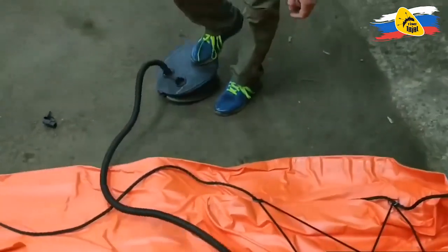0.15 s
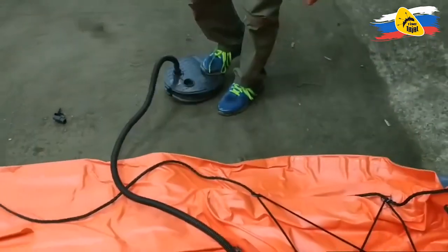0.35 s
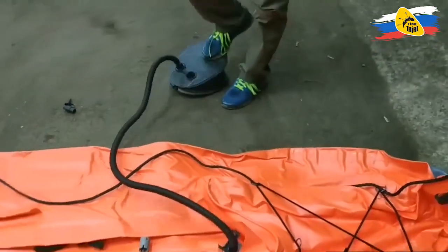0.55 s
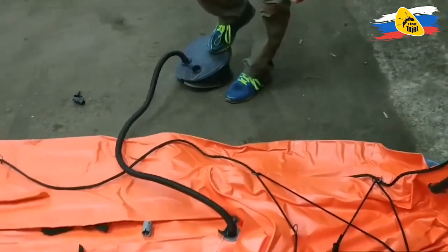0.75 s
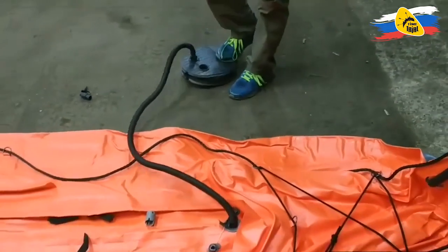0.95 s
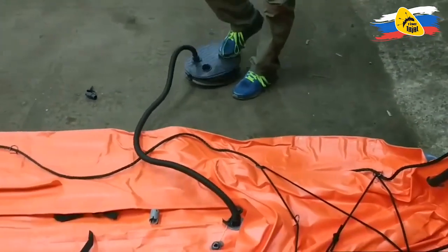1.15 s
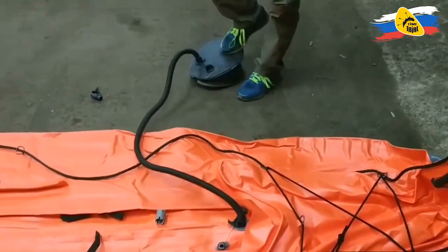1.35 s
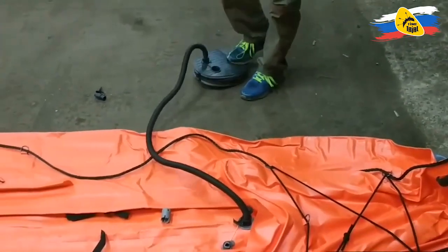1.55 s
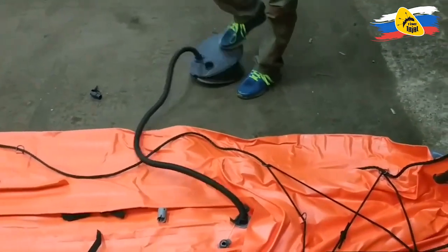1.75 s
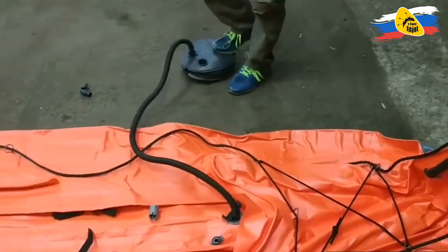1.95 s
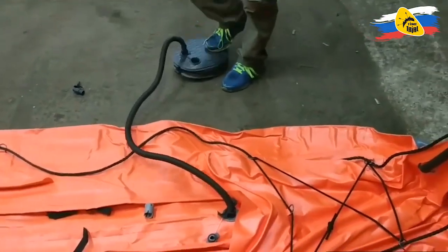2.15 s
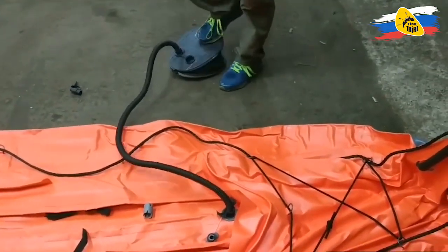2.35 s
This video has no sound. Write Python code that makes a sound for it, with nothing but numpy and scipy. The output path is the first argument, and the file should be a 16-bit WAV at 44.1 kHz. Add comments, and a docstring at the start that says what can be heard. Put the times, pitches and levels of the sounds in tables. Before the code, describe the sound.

A foot pump inflates a boat in four hissing strokes with a thin whistle.

```python
"""A foot bellows pumps up an inflatable boat in a large, hard-floored hall: four strokes.
First the plastic pump ticks and its folds thump and crumple under the foot. Air hisses through
the hose, and the valve whistles on the hose's resonances (the pitches it rings at by itself).
Then, while the whistle lingers in the hall, the bellows spring open and suck in air, crumpling
and thumping again. Three more strokes follow, with a higher, louder whistle."""
import sys
import numpy as np
from scipy import signal
from scipy.fft import rfft, irfft
from scipy.io import wavfile

SR = 44100
rng = np.random.default_rng(int(sys.argv[2]) if len(sys.argv) > 2 else 0)


def output_pcm(signal):
    """Save a mono or channel-first signal as 16-bit PCM at the path in sys.argv[1].

    Samples are clipped to [-1, 1] before scaling.
    """
    pcm = np.clip(np.atleast_2d(signal).T, -1, 1) * 32767
    wavfile.write(sys.argv[1], SR, np.round(pcm).astype(np.int16))


N = 110250


def valve_jet(t, hose_hz, hose_db):
    """How hard the jet drives each hose resonance at times t: most of all near its own pitch."""
    # one table per whistle: (time [s], level [dB], pitch [Hz], spread [Hz])
    whistles = [
        [(.3, -33, 2200, 58), (.33, -26.5, 2290, 90), (.39, -24.5, 2510, 190), (.425, -29, 2930, 250),
         (.46, -20.5, 3110, 258), (.495, -16.5, 3070, 116), (.53, -18.5, 3200, 130), (.55, -42, 3280, 250)],
        [(.565, -32, 2210, 37.7), (.582, -26, 2324, 40)],
        [(1., -33, 3850, 500), (1.04, -16.5, 3770, 450), (1.09, -9, 3645, 100), (1.13, -15, 3740, 198),
         (1.19, -14.5, 3670, 101), (1.23, -20, 3730, 257)],
        [(1.57, -28, 3400, 230), (1.6, -14.5, 3740, 240), (1.63, -10, 3700, 92), (1.655, -11.5, 3730, 26),
         (1.685, -9, 3668, 23), (1.735, -21, 3635, 23), (1.78, -32, 3700, 40), (1.82, -13.5, 3740, 20),
         (1.87, -23.5, 3630, 21)],
        [(1.75, -27, 2470, 40), (1.79, -31.5, 2400, 40)],
        [(2.09, -27, 3730, 694), (2.125, -14, 3800, 700), (2.16, -12.5, 3750, 415), (2.2, -16, 3680, 334),
         (2.26, -17, 3550, 335), (2.3, -13.5, 3500, 110), (2.325, -35, 3700, 200), (2.36, -16.5, 3900, 110)],
    ]
    reach_hz, steepness, edge_s = 484, 1.24, 0.0039
    drive = np.zeros((len(hose_hz), len(t)))
    for rows in whistles:
        times, *columns = np.transpose(rows)
        db, pitch, spread = (np.interp(t, times, c) for c in columns)
        away = hose_hz[:, None] - pitch
        share = amp(hose_db)[:, None] / (1 + (away / spread) ** 2) ** steepness
        share *= np.exp(-(away / reach_hz) ** 4)  # far-off resonances stay silent
        fade = np.exp(-abs(t - np.clip(t, times[0], times[-1])) / edge_s)
        drive += share / np.linalg.norm(share, axis=0) * amp(db) * fade
    return drive


def whistle():
    """The valve jet makes the hose ring; each tone lingers in the hall, with a faint octave on top."""
    # resonances of the hose: (pitch [Hz], level [dB])
    resonances = [(2229, 2), (2335, -2), (2430, 0), (2556, 3), (2989, -1), (3094, 1), (3216, -7),
                  (3340, -3), (3455, 3), (3580, -3), (3688, 2), (3792, -1), (3912, -5), (4030, 2)]
    linger_s, left_lag_s = 1.17, 0.000095
    beat_depth, beat_share, dip_s = .4, .00423, 1.787
    hose_hz, hose_db = np.transpose(resonances)
    t, now = np.arange(0, N / SR, 1 / 1000), np.arange(N) / SR
    drive = valve_jet(t, hose_hz, hose_db)
    kept = decay(t[1], linger_s) ** 2  # share of energy left after each step
    linger = np.sqrt(signal.lfilter([1 - kept], [1, -kept], drive ** 2))
    direct = echo = 0
    for hz, driven, lingering in zip(hose_hz, drive, linger):
        tone = np.exp(2j * np.pi * (hz * now + rng.random()))
        rough = (hose_hz[-1] / hz) ** 2.9  # low resonances are less steady
        stereo = np.exp(-2j * np.pi * hz * left_lag_s * np.array([[1], [0]]))
        flutter = 0.087 * wander(rate_hz=7) + 0.29 * wander(rate_hz=48.5)
        direct += np.interp(now, t, driven) * tone * unit(stereo + rough * flutter)
        # the lingering tone drifts and pulses
        drift = 0.47 * wander(rate_hz=14.3 * rough)
        beat = 1 - beat_depth * np.exp(2j * np.pi * beat_share * hz * (now - dip_s))
        echo += np.interp(now, t, lingering) * tone * unit(1j * stereo * beat + drift)
    swing = np.interp(now, t, np.linalg.norm(drive, axis=0)) + 1e-6
    direct *= (.5 + .5 * abs(direct / swing) ** 2) ** -.3  # the jet limits its own swing
    echo_gain, side_gains = amp(-1.5), amp([[-0.5], [-2.1]])
    doubled = (direct ** 2 + echo_gain * echo ** 2).real  # squaring doubles the pitch
    octave = amp(-33) * unit(band(doubled, hz=7600, width_hz=1400))
    return np.sqrt(2) * side_gains * (direct + echo_gain * echo).real + hall(octave, wet_db=-11)


def push_air():
    """Each push forces air out: it hisses at the valve and rushes through the hose."""
    # pushes of the foot: (start [s], rise [s], hold [s], level [dB])
    pushes = [(.19, 0.19, 0.16, 3.5), (.905, 0.12, 0.16, 4.5), (1.47, 0.099, 0.18, 3.5),
              (1.97, 0.12, 0.14, 2.35)]
    # hiss at the valve: (frequency [Hz], level [dB])
    hiss = [(3000, -69), (4500, -12), (5000, -1.5), (6600, 1.5), (7500, 9), (8700, 2), (9700, 6.5),
            (11900, 1.5), (14500, 5.5), (16200, -4.5)]
    # rush in the hose: (frequency [Hz], level [dB])
    rush = [(200, -13), (500, 1), (900, 0.5), (1500, -1), (2400, 3.5), (3200, 0.5), (4400, -5), (6000, -80)]
    hose_echo_s = .0087
    jet = amp(-28) * patchy(noise(hiss)) + amp(-36.5) * noise(rush)
    jet += .15 * np.roll(jet, round(hose_echo_s * SR), 1)
    return jet * swells(pushes)


def refill_air():
    """The bellows spring open and suck in air: a low draught and a fainter hiss."""
    # openings of the bellows: (start [s], rise [s], hold [s], level [dB])
    refills = [(.6, 0.037, 0.23, -3), (1.26, 0.043, 0.083, 1), (1.79, 0.056, 0.046, 2),
               (2.3, 0.041, 0.058, 1)]
    # draught into the bellows: (frequency [Hz], level [dB])
    draught = [(120, -39), (250, 0), (600, -0.5), (1000, -2.5), (1500, -7.5), (2500, -11.5), (5000, -16),
               (15000, -20)]
    # hiss at the inlet: (frequency [Hz], level [dB])
    hiss = [(1200, -12), (2500, 10), (5000, -3), (7000, 3.5), (11000, -3), (15000, -24)]
    return (amp(-37.5) * noise(draught) + amp(-42.5) * patchy(noise(hiss))) * swells(refills)


def patchy(x):
    """Makes a hiss louder and softer in random patches of time and frequency."""
    depth_db, patch_hz, patch_s = 5, 400, 0.069
    hz, t, spectra = signal.stft(x, SR, nperseg=1024)
    field = np.fft.fft2(rng.standard_normal(spectra.shape[1:]))
    field *= np.exp(-(np.fft.fftfreq(len(hz), hz[1])[:, None] * patch_hz) ** 2)
    field *= np.exp(-(np.fft.fftfreq(len(t), t[1]) * patch_s) ** 2)
    patches = amp(depth_db * unit(np.fft.ifft2(field).real))
    return unit(signal.istft(spectra * patches, SR, nperseg=1024)[1][:, :N])


def fold_thumps():
    """Big folds snap over with a slap and make the bellows ring briefly."""
    # folds snapping: (time [s], level [dB], pitch [Hz], slap compared with ring [dB])
    snaps = [(0.146, -7, 229, -20), (.255, -16.5, 250, -36), (.314, -25, 322, 0.5), (.691, -12, 275, -9),
             (.765, -17, 306, -5.5), (0.778, -13.5, 261, -39), (0.871, -16, 266, -48),
             (.916, -15.5, 295, -12), (.977, -22, 411, 0.5), (1.401, -8.5, 289, -10.5),
             (1.483, -36.5, 303, 14.5), (1.528, -18, 324, -5), (1.851, -15, 271, -4.5),
             (1.906, -14, 287, -10.5), (1.991, -9.5, 286, -35), (2.028, -18.5, 260, -3),
             (2.346, -16.5, 270, -12), (2.393, -14.5, 298, -22)]
    # tones of the bellows: (pitch [ratio], level [dB], fade time [s])
    tones = [(1, -4, 0.11), (0.91, -27, 0.25)]
    # slap of a fold: (frequency [Hz], level [dB])
    slap_colour = [(30, -19), (110, -16), (220, 1.5), (450, 1), (750, -1.5), (1200, -15), (2500, -16),
                   (8000, -45)]
    out, t = np.zeros((2, N)), np.arange(SR // 5) / SR
    rise_s = 0.0041
    for start, db, hz, slap_db in snaps:
        ring = sum(amp(tone_db) * decay(t, fade_s) * np.sin(2 * np.pi * hz * ratio * t)
                   for ratio, tone_db, fade_s in tones)
        slap = amp(slap_db) * noise(slap_colour, len(t)) * decay(t, fade_s=0.11)
        add(out, start, amp(db) * np.minimum(t / rise_s, 1) * (ring + slap))
    return out


def crumple():
    """Small creases click at random as the bellows open and are trodden down."""
    # spells of crumpling: (start [s], rise [s], hold [s], level [dB])
    spells = [(.17, 0.056, 0.23, -1), (.6, 0.08, 0.33, 0), (1.24, 0.11, 0.15, -2), (1.8, 0.12, 0.15, 3.5),
              (2.3, 0.065, 0.31, -1)]
    # sound of a crease: (frequency [Hz], level [dB])
    crease_colour = [(100, -58), (135, -10), (180, -1), (255, 2.5), (330, 1.5), (420, 0), (520, -8.5),
                     (700, -6.5), (1100, -14), (2500, -23.5), (9000, -85)]
    creases_per_s, spread_db = 240, 2
    hits = rng.random(N) < creases_per_s / SR
    sizes = amp(spread_db * np.minimum(rng.exponential(1, N), 3))
    creases = hits * sizes * rng.choice([-1, 1], (2, N))
    return amp(-34) * colour(creases, crease_colour) * swells(spells)


def plastic_ticks():
    """The pump's plastic ticks and scuffs in short bursts of noise."""
    # ticks and scuffs: (time [s], level [dB], centre [Hz], width [Hz], fade time [s])
    ticks = [(.008, -24, 1440, 2140, 0.062), (0.1455, -24, 1770, 1500, 0.063),
             (0.153, -29.5, 7700, 12100, 0.083), (0.2235, -21, 1480, 1070, 0.038),
             (.315, -25.5, 805, 517, 0.13), (0.6563, -14, 4170, 9600, 0.014),
             (0.909, -25, 1130, 434, 0.047), (0.956, -23.5, 1230, 2200, 0.039),
             (1.074, -23.5, 784, 395, 0.12)]
    out, t = np.zeros((2, N)), np.arange(SR // 5) / SR
    for start, db, hz, width_hz, fade_s in ticks:
        burst = unit(band(rng.standard_normal((2, len(t))), hz, width_hz))
        add(out, start, amp(db) * burst * decay(t, fade_s))
    return out


def hall(x, wet_db):
    """Adds the hall's blur of echoes at level wet_db; each frequency dies at its own speed."""
    # how long the hall rings: (frequency [Hz], fade time [s])
    fades = [(100, 0.11), (300, 0.53), (1000, 1), (3500, 0.72), (8000, 0.39), (16000, 0.38)]
    echoes = rng.standard_normal((2, SR)) * (np.arange(SR) > SR // 150)
    hz, t, spectra = signal.stft(echoes, SR, nperseg=256)
    tail = signal.istft(spectra * decay(t, read(fades, hz)[:, None]), SR, nperseg=256)[1]
    return x + amp(wet_db) * signal.fftconvolve(x, tail / np.linalg.norm(tail[0]), axes=1)[:, :N]


def background():
    """The quiet of the hall: a soft, steady, low noise."""
    # room noise: (frequency [Hz], level [dB])
    room_colour = [(25, 18.5), (70, 6), (120, -6.5), (260, 16.5), (500, 0.5), (1200, 1), (3000, -13),
                   (16000, -19)]
    return amp(-38) * noise(room_colour)


def swells(strokes):
    """Loudness curve: each stroke swells quickly, sags a little while held, and lets go."""
    from_db, sag_db_per_s, release_db_per_s = -29.5, -19.5, -200
    t, total = np.arange(N) / SR, 0
    for start, rise, hold, db in strokes:
        onset = from_db * np.maximum(1 - (t - start) / rise, 0) ** 2
        sag = sag_db_per_s * np.clip(t - start - rise, 0, hold)
        release = release_db_per_s * np.maximum(t - start - rise - hold, 0)
        total += amp(db + onset + sag + release)
    return unit(total)


def colour(x, spectrum):
    """Sets the bass and treble of two unrelated signals and blends them into left and right."""
    # how alike the sides are: (frequency [Hz], likeness [-1 to 1])
    likeness = [(60, -0.15), (200, 1), (380, 0.85), (700, 0.94), (1300, 0.13), (2400, 0.57), (4400, 0.57),
                (8000, -0.38), (15000, 0.026)]
    # which side is louder: (frequency [Hz], left minus right [dB])
    balance = [(60, -0.5), (280, -1.5), (650, 0), (1400, 2.5), (3000, 3), (7500, -1), (14000, 1.5)]
    hz = np.fft.rfftfreq(x.shape[1], 1 / SR)
    left, other = rfft(x)
    alike = np.clip(read(likeness, hz), -1, 1)
    right = alike * left + np.sqrt(1 - alike ** 2) * other
    gain = amp(read(spectrum, hz) + np.outer([.5, -.5], read(balance, hz)))
    return unit(irfft(np.array([left, right]) * gain, x.shape[1]))


def noise(spectrum, size=N):
    """Stereo noise shaped by a (frequency, level) table."""
    return colour(rng.standard_normal((2, size)), spectrum)


def band(x, hz, width_hz):
    """Keeps mainly the frequencies near hz."""
    f = np.fft.rfftfreq(x.shape[-1], 1 / SR)
    return irfft(rfft(x) / (1 + (2 * (f - hz) / width_hz) ** 2), x.shape[-1])


def wander(rate_hz, size=2048):
    """A smooth random wobble for a tone's strength and timing, one curve per side."""
    f = np.fft.fftfreq(size, N / SR / size)
    draws = rng.standard_normal((2, size)) + 1j * rng.standard_normal((2, size))
    curves = unit(np.fft.ifft(draws * np.exp(-(f / rate_hz) ** 2)))
    return np.array([np.interp(np.linspace(0, size - 1, N), np.arange(size), c) for c in curves])


def decay(t, fade_s):
    """Dies away by 60 dB in the fade time."""
    return amp(-60 * t / fade_s)


def amp(db):
    """Turns decibels into a multiplier."""
    return 10 ** (np.asarray(db) / 20)


def unit(x):
    """Scales to an average power of 1."""
    return x / np.sqrt(np.mean(abs(x) ** 2) + 1e-20)


def read(points, hz):
    """Reads between a table's rows, with octaves evenly spaced."""
    f, value = np.transpose(points)
    return np.interp(np.log(hz + 1), np.log(f + 1), value)


def add(mix, start_s, sound):
    """Mixes a sound in at the given time."""
    part = mix[:, round(start_s * SR):][:, :sound.shape[-1]]
    part += sound[..., :part.shape[1]]


def scene():
    """Valve, air and bellows over the quiet of the hall."""
    air = hall(push_air() + refill_air(), wet_db=-5.5)
    bellows = hall(fold_thumps() + crumple() + plastic_ticks(), wet_db=-10.5)
    return whistle() + air + bellows + background()


def record(dry):
    """Cuts the deep bass and the highest treble."""
    low_hz, high_hz = 145, 16300
    x = signal.sosfilt(signal.butter(2, low_hz, "high", fs=SR, output="sos"), dry)
    return signal.oaconvolve(x, signal.firwin(511, high_hz, window=("kaiser", 9), fs=SR)[None], "same")


dry = scene()
out = record(dry)
output_pcm(out)
```